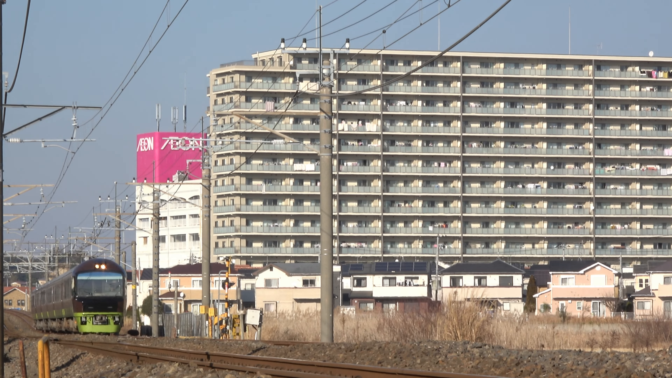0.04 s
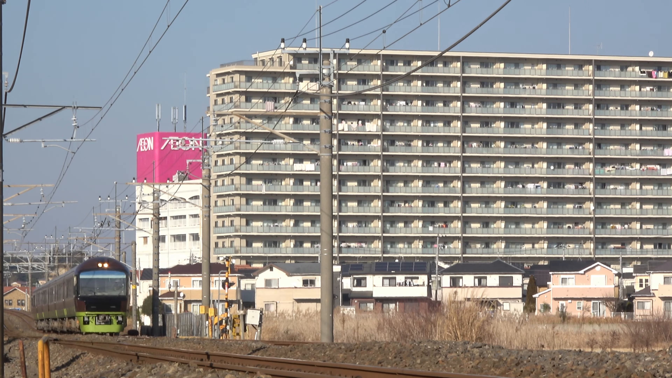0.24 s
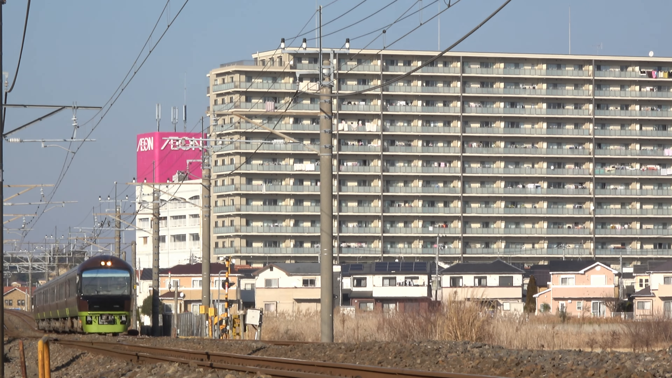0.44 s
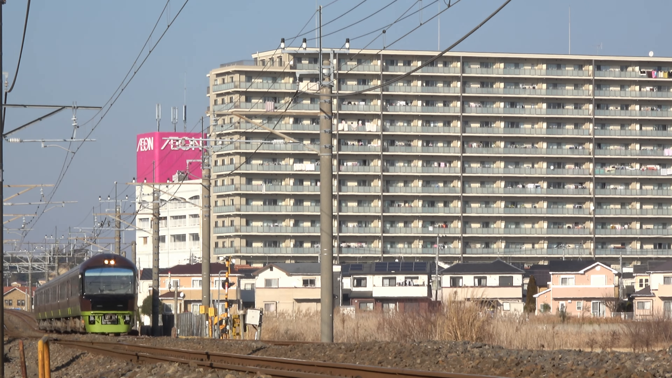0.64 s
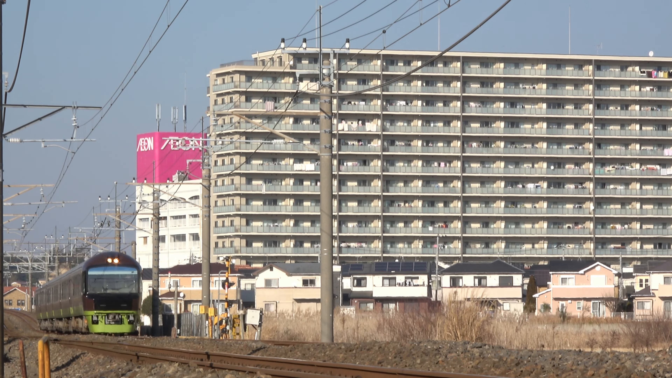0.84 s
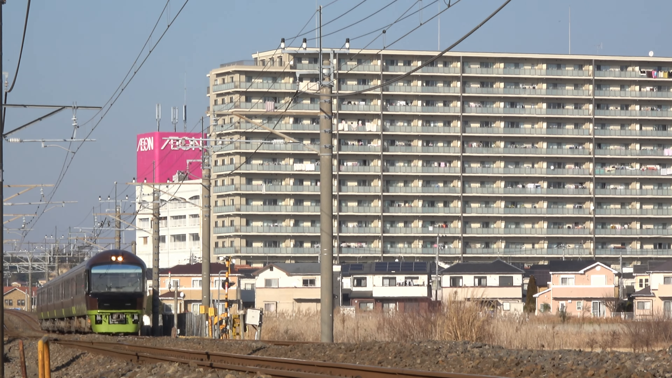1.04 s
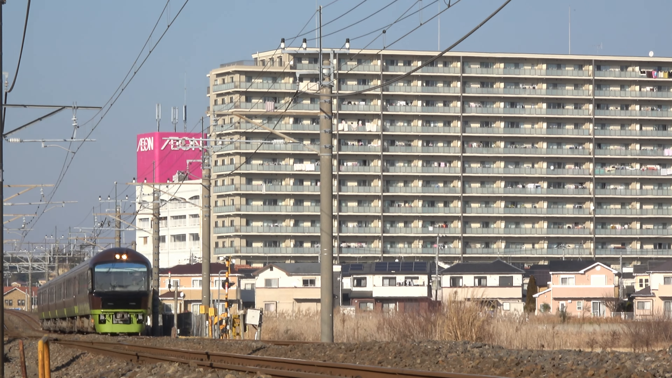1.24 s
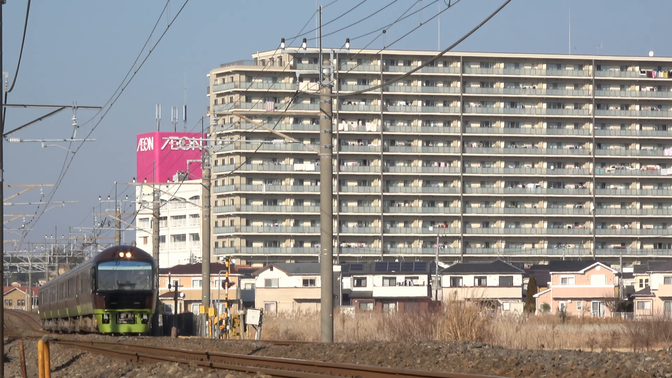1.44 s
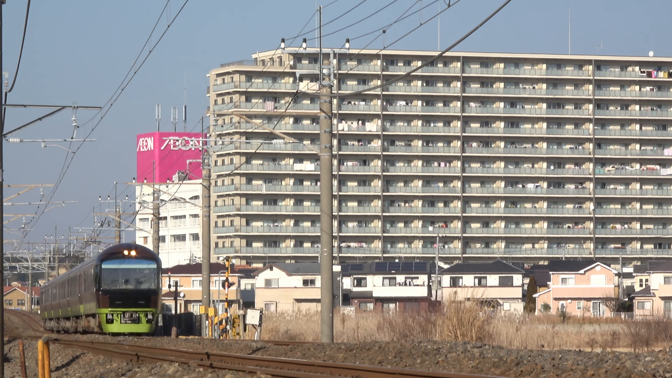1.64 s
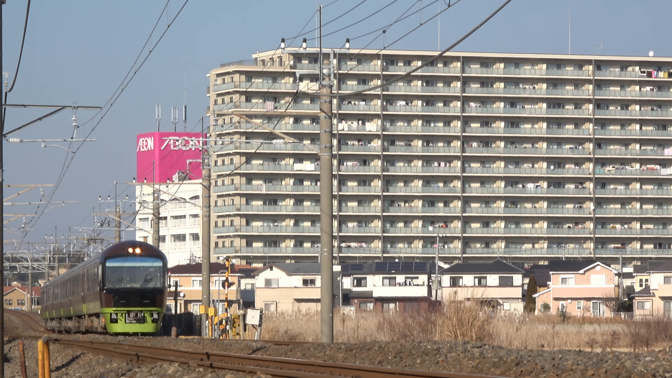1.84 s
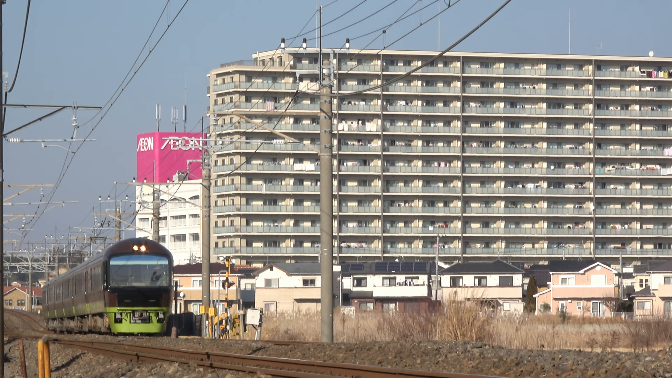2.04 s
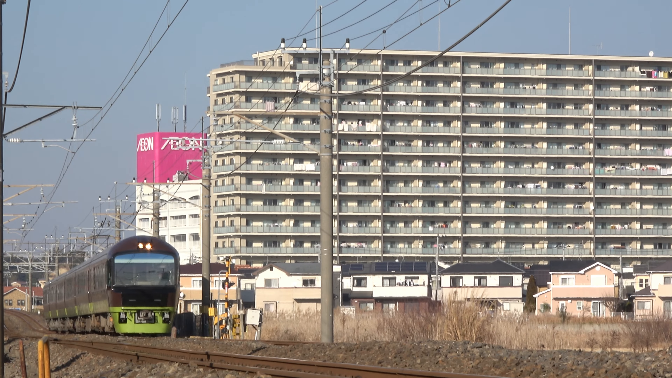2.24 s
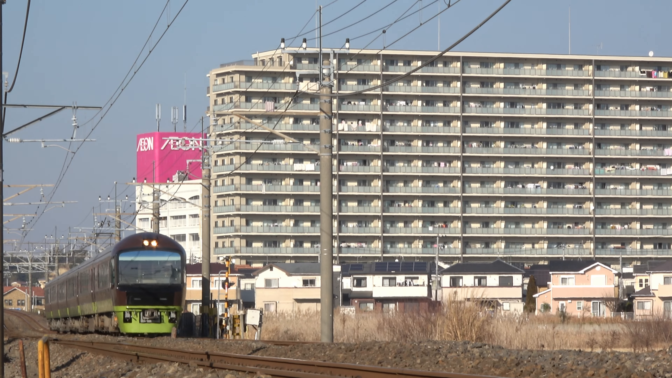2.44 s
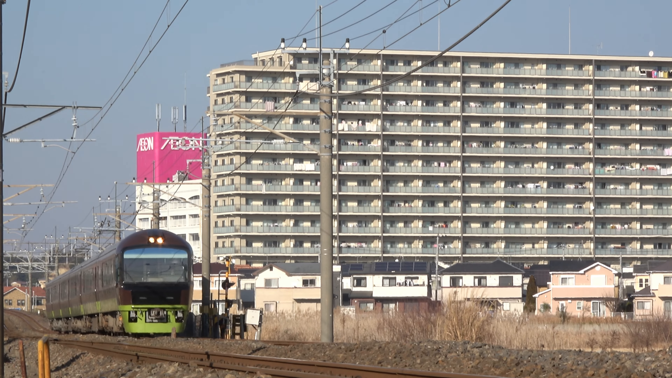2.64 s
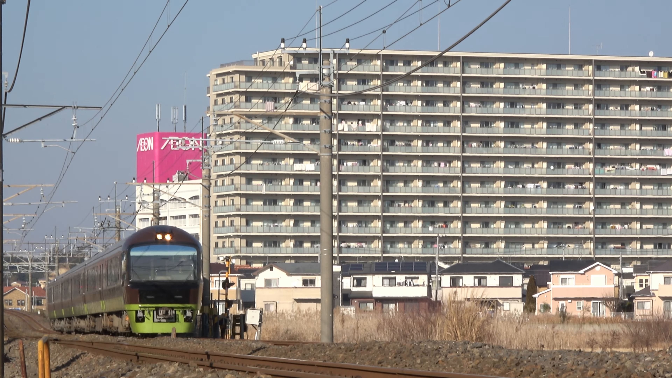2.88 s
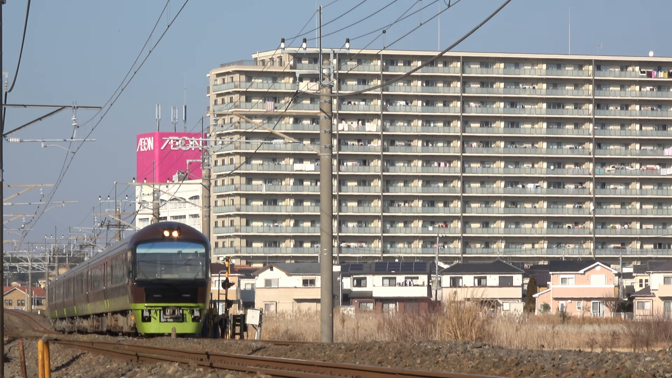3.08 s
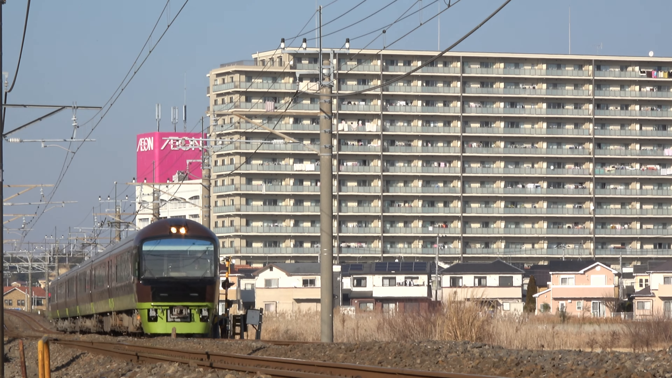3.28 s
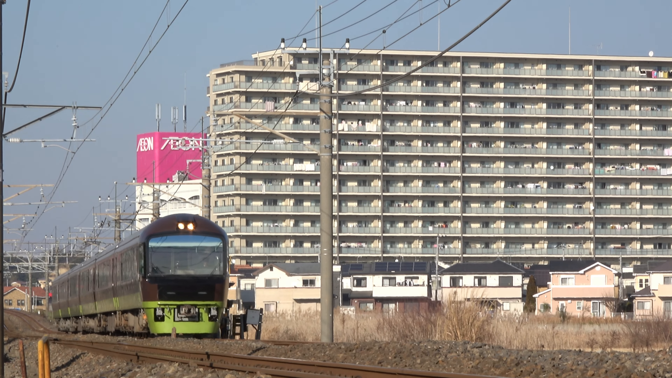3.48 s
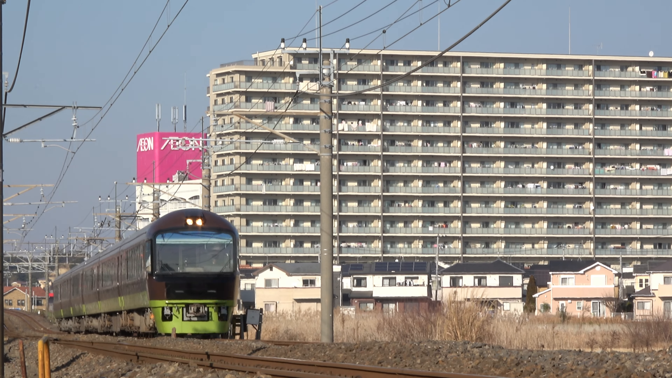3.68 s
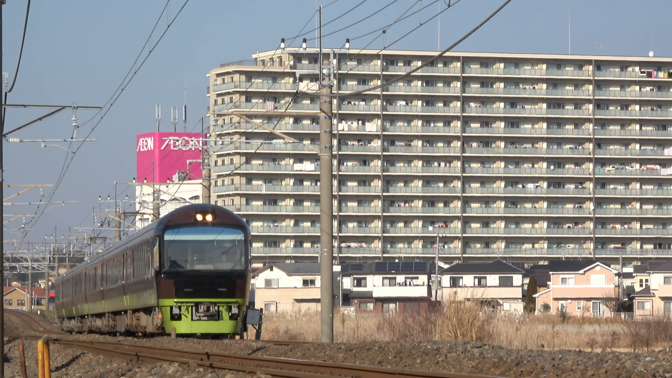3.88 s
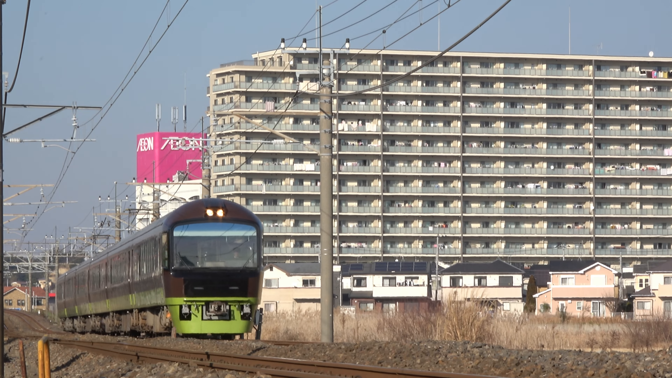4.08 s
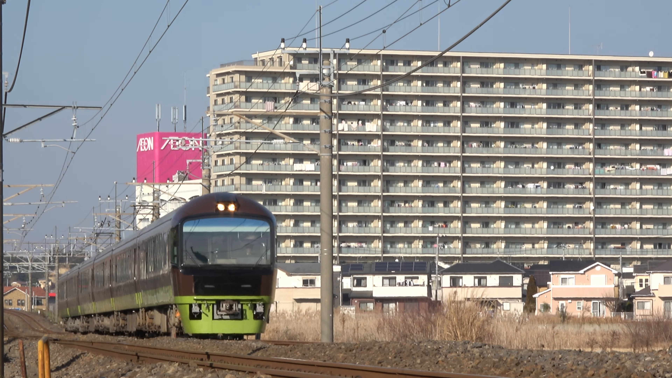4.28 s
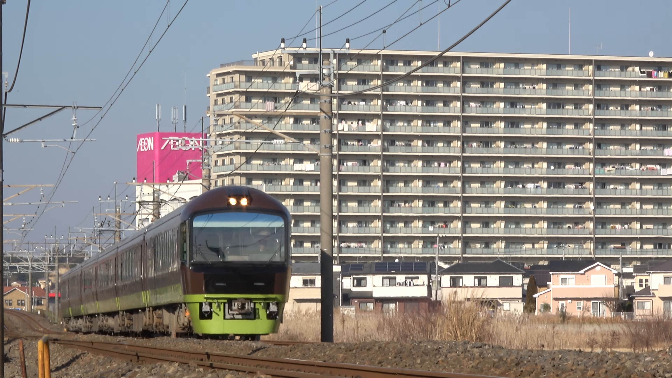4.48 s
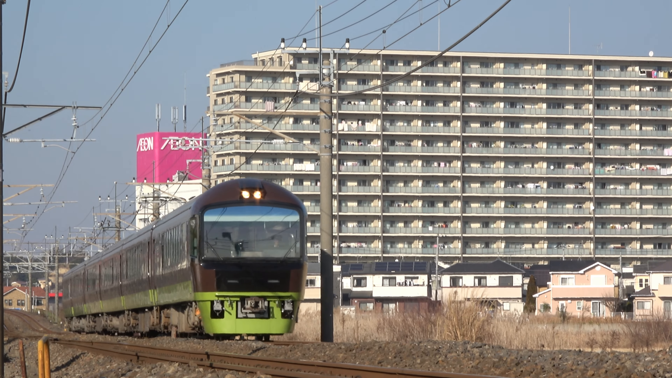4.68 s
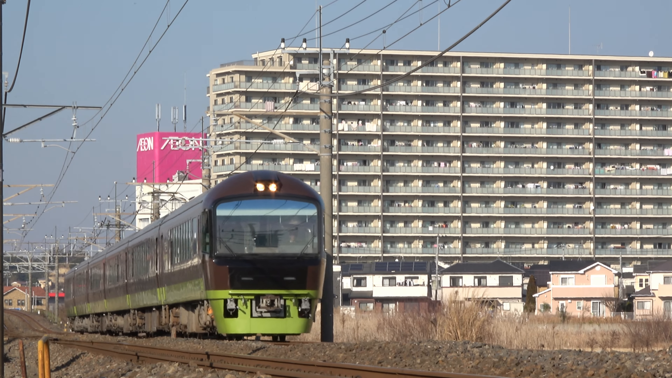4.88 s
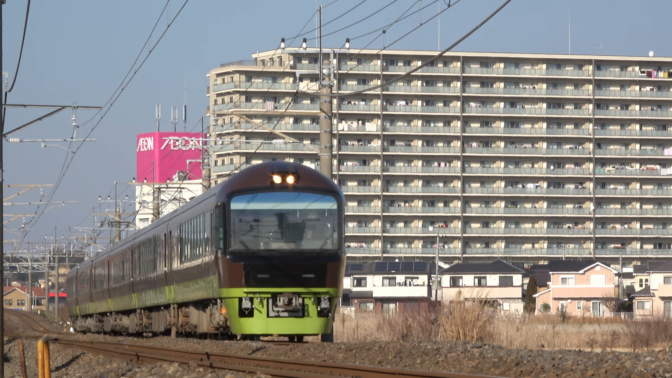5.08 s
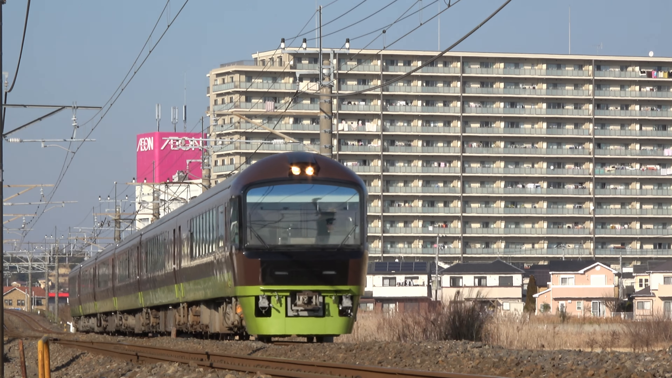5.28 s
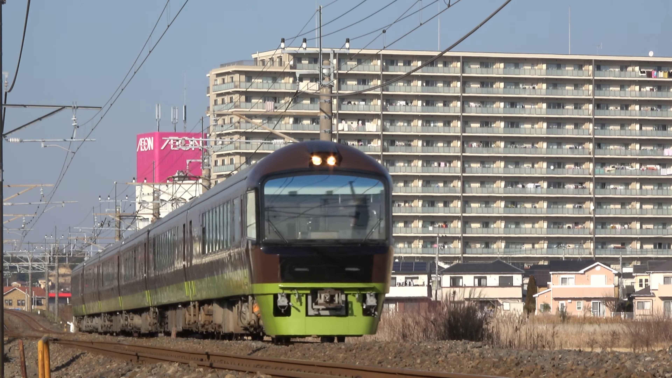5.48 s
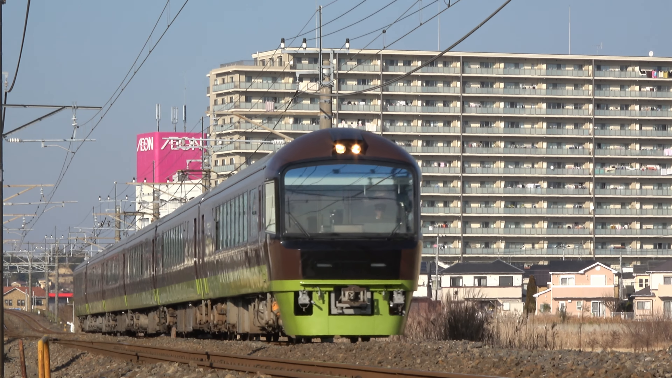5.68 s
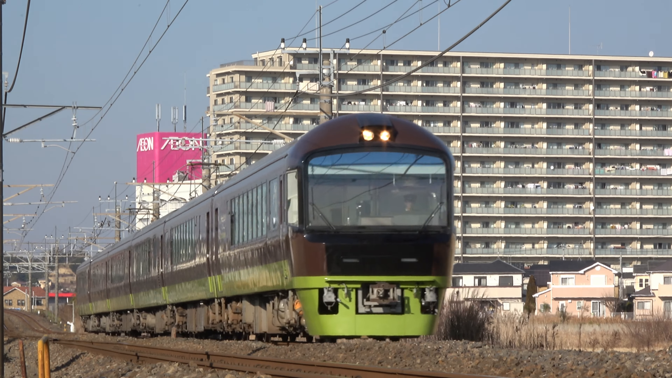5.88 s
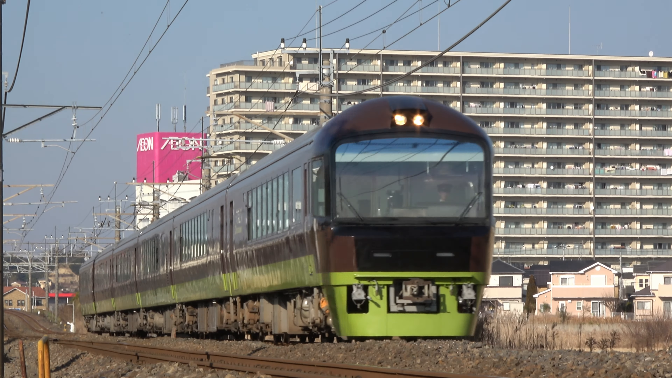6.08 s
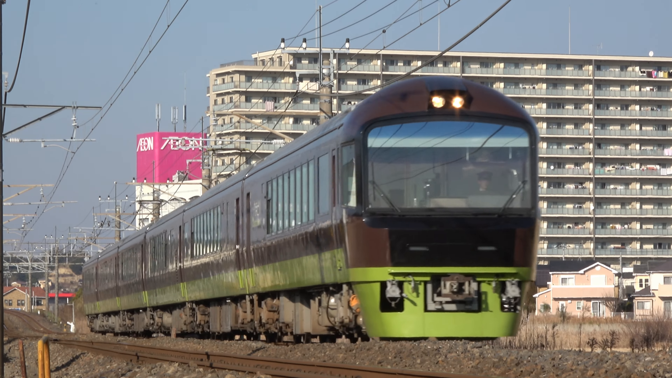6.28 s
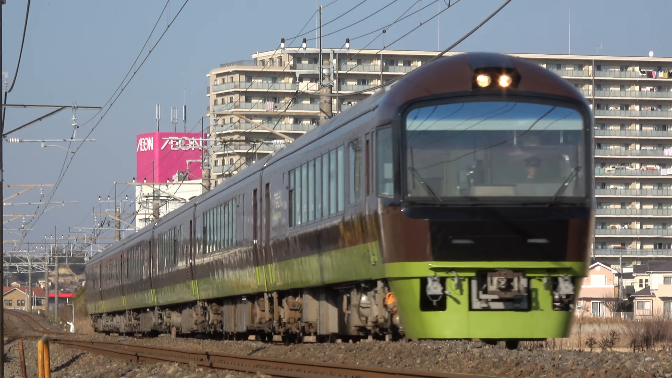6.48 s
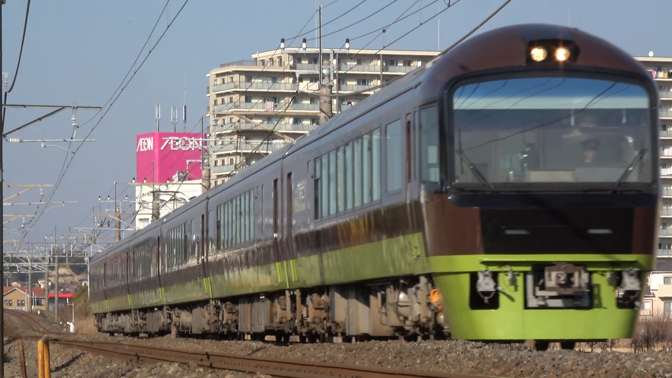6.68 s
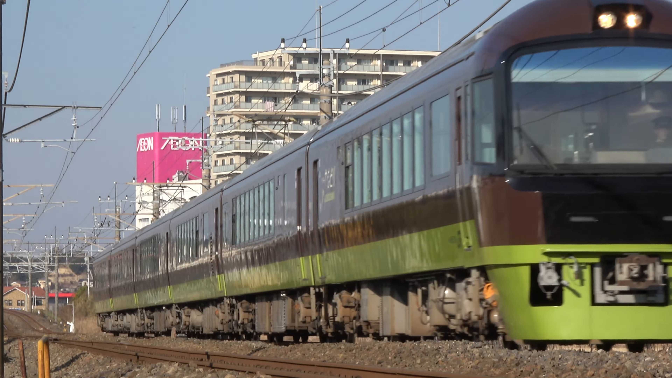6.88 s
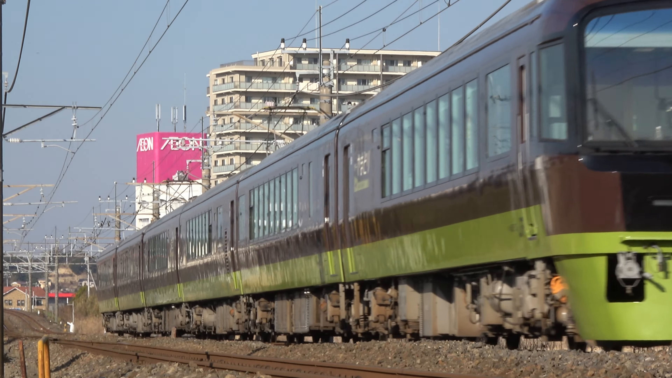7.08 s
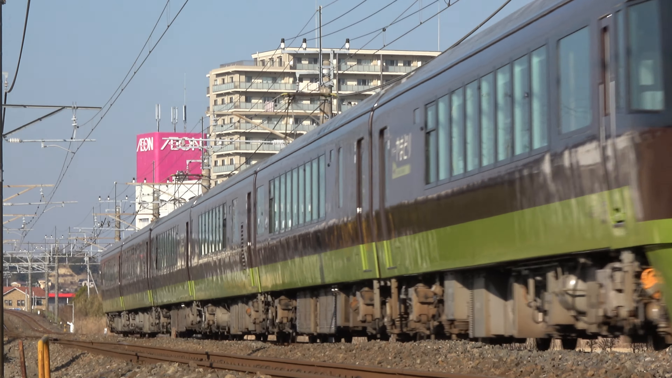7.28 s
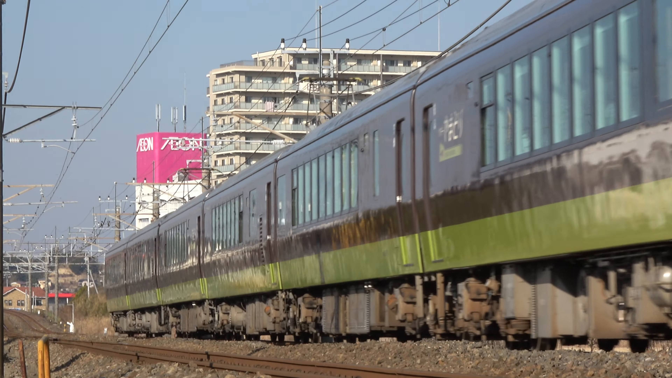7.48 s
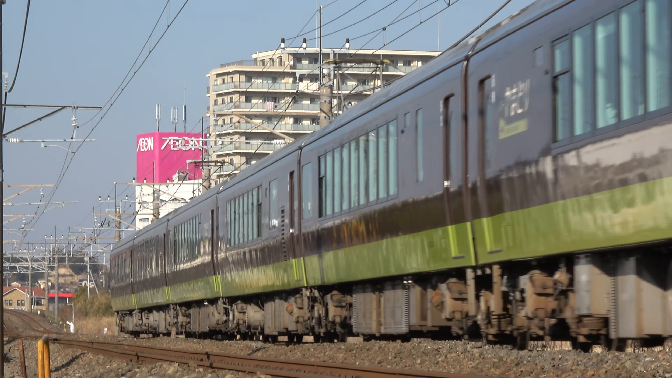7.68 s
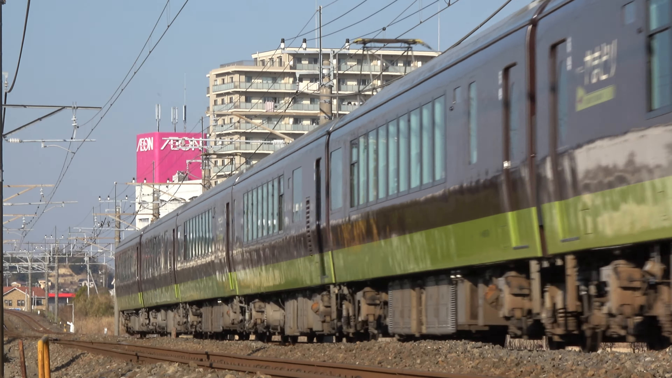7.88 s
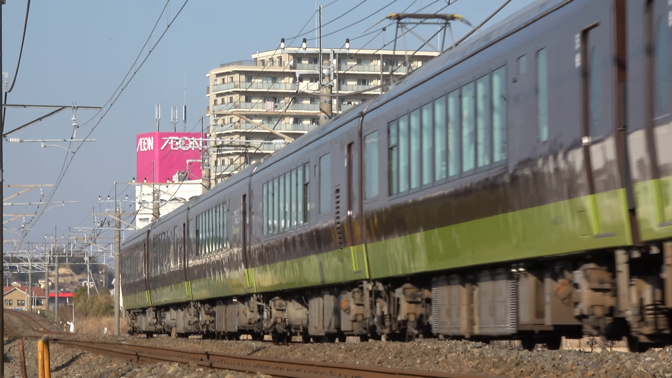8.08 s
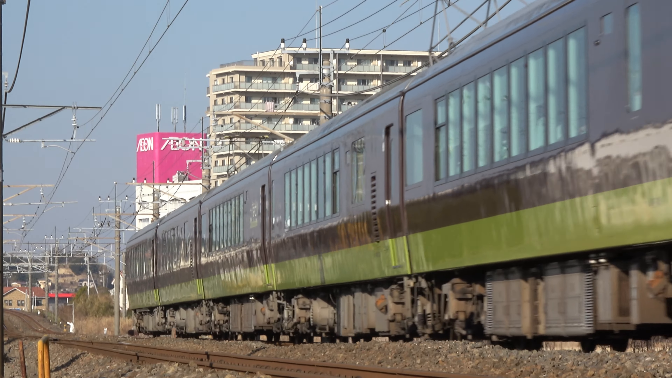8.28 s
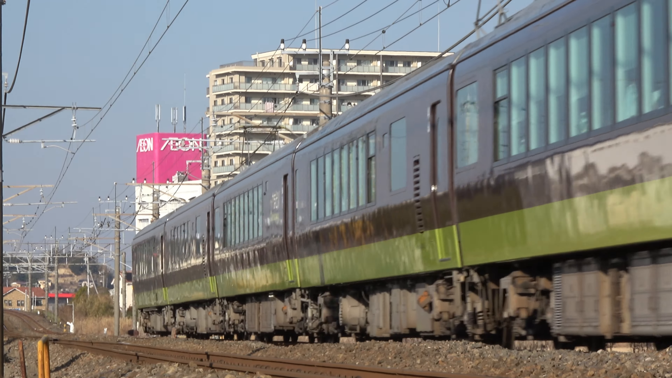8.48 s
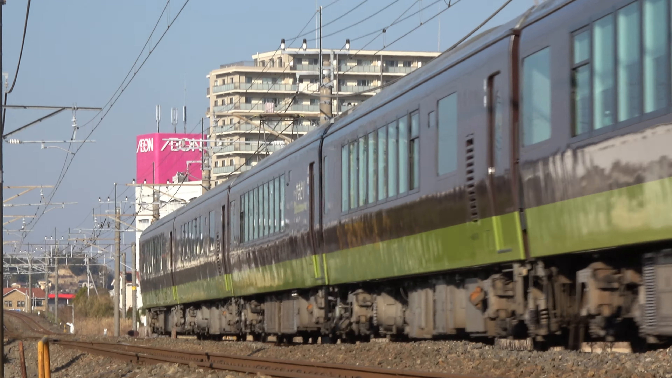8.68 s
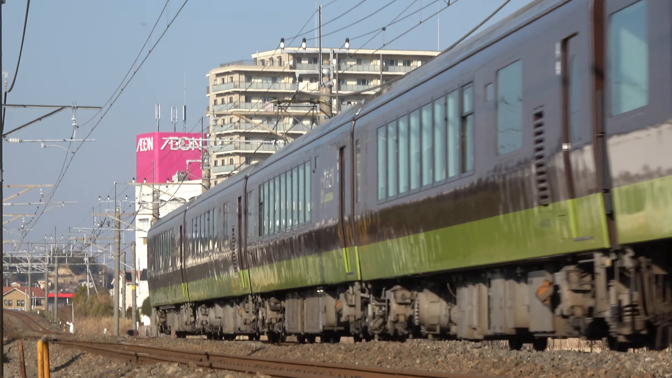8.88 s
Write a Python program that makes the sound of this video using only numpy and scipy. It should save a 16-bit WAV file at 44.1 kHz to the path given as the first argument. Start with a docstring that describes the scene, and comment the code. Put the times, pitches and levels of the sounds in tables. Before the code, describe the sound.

A stereo microphone close to the track hears a distant train as faint hum, rumble and rapid falling rail chirps from the left. Rails sing and hiss ahead of it while a camera's mirror and shutter clack close by. Rolling noise grows into a bright steel roar with heavy knocks and drumming, loudest at the end as cars pass on the right.

```python
"""Beside a bend in a railway, an electric train nears and sweeps past close on the right.
A flat spot on one wheel strikes the rail once a turn, and each blow runs ahead as a falling chirp.
Then steel rolling on steel makes bogies boom and wheels roar, hiss and ring; knocks and drumming join in,
and a thin whine drops in pitch. The rails sing and hiss ahead of the train, over a faint hum and air noise.
A camera's mirror and shutter clack nearby: one frame, a pair, then a fast run; a few small ticks fall too."""
import sys
import numpy as np
from scipy import signal
from scipy.fft import rfft, irfft, next_fast_len
from scipy.io import wavfile
from scipy.ndimage import uniform_filter1d

SR = 44100
rng = np.random.default_rng(int(sys.argv[2]) if len(sys.argv) > 2 else 0)


def transcribe(signal):
    """Save signal, clipped to [-1, 1], as a 16-bit WAV file at the path in sys.argv[1]."""
    frames = np.atleast_2d(signal).T
    limited = np.clip(frames, -1, 1)
    pcm = np.round(limited * 32767).astype(np.int16)
    wavfile.write(sys.argv[1], SR, pcm)


N = 393813
TIME = np.arange(N) / SR


def undb(db):
    """Turn decibels into a gain."""
    return 10 ** (np.asarray(db) / 20)


def curves(table):
    """Join each column of a table by straight lines in time."""
    s, *columns = np.transpose(table)
    return [np.interp(TIME, s, column) for column in columns]


def swells(table, width_s):
    """Add up smooth rises and dips in level, in dB, one for each (t/s, level change/dB)."""
    return sum(db * np.exp(-((TIME - s) / width_s) ** 2) for s, db in table)


def plateau(s, length, fade_s):
    """Make an envelope that fades in, holds and fades out."""
    return np.interp(TIME, [s, s + fade_s, s + length - fade_s, s + length], [0, 1, 1, 0])


def strike(t, rise, decay):
    """Shape a blow: a quick straight rise, then exponential decay."""
    return np.clip(t / rise, 0, 1) * np.exp(-np.maximum(t - rise, 0) / decay)


def unit(x):
    """Scale to rms 1."""
    return x / np.sqrt(np.mean(x ** 2))


def noise(colour, size=N):
    """Make noise of rms 1 whose spectrum follows (f/Hz, level/dB) and falls steeply beyond the ends."""
    n = next_fast_len(size, True)
    octave = np.log2(np.arange(n // 2 + 1) * SR / n + 1)
    hz, db = np.transpose(colour)
    outside = np.abs(octave - np.clip(octave, np.log2(hz[0]), np.log2(hz[-1])))
    gain = undb(np.interp(octave, np.log2(hz), db) - 60 * outside)
    white = rng.standard_normal(n)
    return unit(irfft(gain * rfft(white), n)[:size])


def walk(rate):
    """Drift smoothly at random around 0, with a spread near 1; rate is in steps per second."""
    k = max(int(SR / rate), 1)
    steps = np.repeat(rng.standard_normal(N // k + 1), k)
    return unit(uniform_filter1d(uniform_filter1d(steps, k), k)[:N])


def tone(hz, waver, rate):
    """Make a sine of rms 1 whose pitch wavers."""
    wavering_hz = hz * (1 + waver * walk(rate))
    return np.sqrt(2) * np.sin(2 * np.pi * np.cumsum(wavering_hz) / SR)


def pan(db):
    """Give left and right gains that average 1; db is left minus right."""
    left = np.atleast_1d(undb(db))
    return 2 * np.array([left, np.ones_like(left)]) / (1 + left)


def spread(colour, pan_db, width):
    """Make a wide source: noise from one bearing, plus scatter that differs between the ears."""
    opposite = np.array([[1], [-1]])
    return pan(pan_db) * (noise(colour) + width * opposite * noise(colour))


def add(out, s, sound):
    """Mix a sound in at a time in seconds."""
    i = max(int(s * SR), 0)
    out[..., i:i + sound.shape[-1]] += sound[..., :max(N - i, 0)]


# the train: its speed, when its leading wheels draw level, and how far off the track lies
SPEED_M_S, ARRIVES_S, TRACK_M = 24, 8.6, 7


def ahead(reach_m=0):
    """Metres that the front of the train has still to come; zero while the cars go by."""
    return np.maximum(SPEED_M_S * (ARRIVES_S - TIME) - reach_m, 0)


def doublings():
    """How many times the distance is double that of the train alongside."""
    return np.log2(np.hypot(ahead(), TRACK_M) / TRACK_M)


# the close-up colours take over around this distance, this abruptly
CLOSE_UP_M, CLOSE_UP_STEEPNESS = 48, 4


def nearness():
    """Go from 0 far off to 1 alongside."""
    return 1 / (1 + (ahead() / CLOSE_UP_M) ** CLOSE_UP_STEEPNESS)


def carried(close_db, doubling_db, track_db, db_per_m, reach_m, stretch_db=0):
    """Level in dB: sound that spreads through the air, plus sound that the track carries ahead."""
    metres = ahead(reach_m)
    by_air = undb(close_db - doubling_db * np.log2(np.hypot(metres, TRACK_M) / TRACK_M))
    by_track = undb(track_db - db_per_m * metres + stretch_db)
    return 20 * np.log10(np.hypot(by_air, by_track))


# where parts are heard, left minus right: (t/s, roar level/dB, rail level/dB, wheels level/dB)
SIDES = [(0, 10, 2, 14), (2.4, 6.2, -6, 4), (5.2, 0, -20.5, -1.5), (7.4, -5, -19, -3.5),
         (7.9, -5, -9.5, -4), (8.35, -7, -6.5, -7), (8.75, -20.5, -20, -15), (8.93, -27, -29, -18)]


def sides():
    """Follow the bearings of roar, rail and wheels; some sources use only a share of one."""
    return curves(SIDES)


# some stretches of track pass the sound on better than others: (t/s, level/dB)
TRACK_STRETCHES = [(0, -2), (1.2, -6), (1.33, -1), (1.45, -7), (1.56, 10), (1.7, -1), (2.05, 2), (2.28, -4),
                   (2.4, 1), (2.63, -3), (2.75, 5), (2.98, 3.5), (3.1, -5), (3.32, -5), (3.44, 6),
                   (3.67, 6), (3.9, -4), (4.13, 4), (4.24, 3), (4.36, -4), (4.57, -5), (4.69, 6), (4.92, 6),
                   (5.03, -2), (5.25, 0), (5.37, 5), (5.48, -9), (5.59, 4), (5.7, 5), (5.82, -1), (5.93, 5),
                   (6.03, 3.5), (6.14, -2), (6.25, -1), (6.37, 4), (6.47, -9), (6.6, 0), (6.8, -5),
                   (6.92, -3), (7.02, 2), (7.13, -3), (7.34, -6)]


def stretches():
    """Follow how well the track passes sound on, in dB."""
    return curves(TRACK_STRETCHES)[0]


# colour of the faint air noise: (f/Hz, relative level/dB per Hz)
AIR_COLOUR = [(1500, 9), (4500, -13), (6000, -1), (9000, -3.5), (13000, -3.5), (16000, -6)]


def air():
    """A faint steady hiss, spread wide, from shaped noise."""
    return undb(-70.5) * spread(AIR_COLOUR, 0, width=1.0)


HUM_HZ, HUM_DB = 317.5, -57.5
HUM_START_S, HUM_ATTACK_S, HUM_HOLD_S, HUM_RELEASE_S = .62, .14, .7, .8


def distant_hum():
    """A distant hum, one slightly wavering sine, swells once."""
    corners_s = np.cumsum([HUM_START_S, HUM_ATTACK_S, HUM_HOLD_S, HUM_RELEASE_S])
    swell = np.interp(TIME, corners_s, [0, 1, 1, 0])
    return tone(HUM_HZ, waver=.002, rate=11.9) * undb(HUM_DB) * swell * pan(db=15)


# small sharp ticks: (t/s, level/dB, centre f/Hz)
SMALL_TICKS = [(3.004, -39, 3300), (3.581, -57, 9000), (4.357, -39, 3200), (4.672, -57, 8000),
               (5.626, -52, 9200), (5.758, -42, 3600)]


def ticks():
    """Tiny dry clicks are very short bursts of noise."""
    out, t = np.zeros(N), np.arange(SR // 30) / SR
    for s, db, hz in SMALL_TICKS:
        click = noise([(hz / 2, -14), (hz, 0), (hz * 1.9, -18)], size=len(t))
        add(out, s, undb(db) * click * strike(t, rise=0.00046, decay=0.0025))
    return out * pan(db=-2)


# the rails sing faintly ahead of the train: (t/s, length/s, f/Hz, level/dB)
RAIL_SONG = [(2.43, .55, 5105, -80.5), (3.17, .15, 5105, -83), (4.05, 0.14, 5290, -76),
             (4.66, 1.1, 5930, -81), (4.66, 1.1, 5580, -81), (4.66, 1.1, 6250, -80),
             (5.01, 0.2, 5115, -68.5), (5.2, 0.6, 5100, -77), (5.72, 1.7, 6280, -73)]
SING_FADE_S, SING_WIDTH_HZ, SING_FLICKER_DB = .05, 95, .5


def rail_song():
    """The rails sing in faint, ragged swells: each tone is a narrow band of noise."""
    song = 0
    for s, length, hz, db in RAIL_SONG:
        ragged = walk(SING_WIDTH_HZ) + 1j * walk(SING_WIDTH_HZ)
        drive = ragged * undb(db + SING_FLICKER_DB * walk(14))
        song = song + plateau(s, length, SING_FADE_S) * np.real(drive * np.exp(2j * np.pi * hz * TIME))
    return song * pan(db=-7)


# colour of the rails' hiss: (f/Hz, relative level/dB per Hz)
RAIL_HISS_COLOUR = [(1700, -8), (2200, 0), (2700, 0), (3400, -5), (4200, -15), (5200, -18)]
# how that hiss rises and falls: (t/s, level/dB)
RAIL_HISS_LEVEL = [(3.3, -78), (3.75, -61), (4.2, -65), (4.8, -67), (5.3, -60), (5.7, -59), (6.3, -62),
                   (7, -57), (7.5, -48), (7.9, -45), (8.3, -42), (8.6, -50)]


def rail_hiss():
    """Fine roughness of the track makes the rails hiss in uneven swells."""
    db = curves(RAIL_HISS_LEVEL)[0] + 1.5 * walk(9) + 2 * walk(70)
    return undb(db) * spread(RAIL_HISS_COLOUR, sides()[2], width=.3)


# the camera fires, singly or in runs: (first frame t/s, number of frames, level/dB added to every stroke)
CAMERA_RELEASES = [(3.072, 1, -4.1), (4.422, 2, -4.9), (5.848, 1, -3.8), (5.996, 10, -4.4)]
FRAME_S = .1427  # from one frame of a run to the next
# strokes of the three moving parts: (t/s around the frame's own time, level/dB, decay/s)
MIRROR_UP_STROKES = [(-.0505, -34.5, 0.008), (-.0412, -33, 0.0085), (-.0315, -36.5, 0.0084),
                     (-.0172, -44.5, .007)]
CURTAIN_STROKES = [(-.0042, -37.5, 0.0032), (.0004, -24, 0.0044), (.0112, -38.5, 0.0069)]
MIRROR_DOWN_STROKES = [(0.0182, -32.3, 0.004), (0.022, -29, 0.0013), (.0256, -32, 0.0085),
                       (.0402, -56.5, 0.0074)]
# what the strokes of each part ring with: (f/Hz, relative level/dB per Hz)
MIRROR_UP_COLOUR = [(300, -13), (900, -8), (1600, -1.5), (2400, 0), (3200, 0), (4200, -6.5), (5700, -9),
                    (7200, -12.5), (9000, -10.5), (11000, -16), (15500, -25)]
CURTAIN_COLOUR = [(300, -8), (850, 1), (1300, -1), (1880, 3), (2300, -1.5), (3200, -1.5), (5400, -12.5),
                  (7400, -4), (9500, -8), (11400, -8), (14000, -12), (15800, -20)]
MIRROR_DOWN_COLOUR = [(300, -5), (900, -3), (1600, 6.5), (3200, 6.5), (4500, 3.5), (5700, -0.5), (7300, -1),
                      (9000, 3.5), (10800, -1.5), (14000, -3), (15800, -6)]
# the camera body rings on after the mirror starts up: (f/Hz, level/dB, decay/s)
CAMERA_BODY_TONES = [(2050, -51, .009), (3110, -45, .009), (4400, -53, .007)]
CAMERA_DETUNE = .06  # random spread of those pitches, as a share


def shutter():
    """The mirror flips up and bounces, the curtain snaps, the mirror drops and rattles; the body rings."""
    out, lead = np.zeros((2, N)), .06  # seconds kept free for strokes before the frame's own time
    t = np.arange(SR // 6) / SR - lead
    opposite = np.array([[1], [-1]])
    frames = [(s + k * FRAME_S, db) for s, shots, db in CAMERA_RELEASES for k in range(round(shots))]
    parts = [(MIRROR_UP_COLOUR, MIRROR_UP_STROKES), (CURTAIN_COLOUR, CURTAIN_STROKES),
             (MIRROR_DOWN_COLOUR, MIRROR_DOWN_STROKES)]
    for colour, strokes in parts:
        power = sum((undb(db) * strike(t - s, rise=0.001, decay=decay)) ** 2 for s, db, decay in strokes)
        blows = np.sqrt(power)
        body = noise(colour, size=len(t))  # the same parts ring alike in every frame
        for s, db in frames:
            centre, side = [noise(colour, size=len(t)) for _ in range(2)]
            # levers chatter within each stroke, which breaks it into tiny clicks
            chatter = undb(2.1 * noise([(250, 0), (1000, 0)], size=len(t)) - .2)
            clatter = 0.45 * body + 0.85 * centre + .4 * opposite * side
            add(out, s - lead, undb(db) * blows * chatter * clatter)
    for s, db in frames:
        for hz, mode_db, decay in CAMERA_BODY_TONES:
            swell = strike(t - MIRROR_UP_STROKES[0][0], rise=.01, decay=decay)
            detuned_hz = hz * (1 + CAMERA_DETUNE * rng.standard_normal())
            ring = np.sqrt(2) * np.sin(2 * np.pi * detuned_hz * t)
            add(out, s - lead, undb(db + mode_db) * swell * ring)
    return out * pan(db=-5)


# pitch at the source, when it passes and how far to the side
WHINE_HZ, WHINE_PASSES_S, WHINE_SIDE_M = 6770, 8.7, 4.2
# it is beamed forward, so it peaks early and fades fast
WHINE_PEAK_S, WHINE_DB, WHINE_RISE_DB_PER_S, WHINE_FADE_DB_PER_S = 8.3, -36.3, 31, 48
# the whine breaks into patches: (t/s, level change/dB)
WHINE_SWELLS = [(7.7, 4), (7.98, -5), (8.1, 3), (8.21, -7), (8.29, 2), (8.36, -6), (8.42, 3)]
WHINE_PATCH_S = .03


def whine():
    """An unsteady whine under the leading car grows as it nears; motion lowers its pitch as it passes."""
    along = SPEED_M_S * (WHINE_PASSES_S - TIME)
    # closing speed as a share of the speed of sound
    closing_mach = SPEED_M_S / 343 * along / np.hypot(along, WHINE_SIDE_M)
    late = TIME - WHINE_PEAK_S
    db = WHINE_DB - np.maximum(-WHINE_RISE_DB_PER_S * late, WHINE_FADE_DB_PER_S * late)
    db = db + swells(WHINE_SWELLS, WHINE_PATCH_S)
    flutter = undb(3 * walk(110) - 1.5)
    return tone(WHINE_HZ * (1 + closing_mach), waver=.007, rate=380) * undb(db) * flutter * pan(db=-4)


# the car bodies drum on one note at a time: (t/s, length/s, f/Hz, level/dB)
DRUM_NOTES = [(8.01, .08, 200, -27), (8.255, .08, 185, -22), (8.485, .135, 188, -18.5),
              (8.595, .095, 228, -20.5), (8.7, .09, 231, -19), (8.78, .14, 229, -24)]
DRUM_FADE_S = .025


def drumming():
    """Floor panels of the cars boom briefly, each time on one wavering note."""
    out = 0
    for s, length, hz, db in DRUM_NOTES:
        out = out + undb(db) * plateau(s, length, DRUM_FADE_S) * tone(hz, waver=.015, rate=60)
    return out * pan(.25 * sides()[0])


# heavy knocks of wheel flats and welds: (t/s, level/dB before the ring and rattle shares, f/Hz, decay/s)
HEAVY_KNOCKS = [(2.06, -41, 120, .051), (5.235, -36.5, 130, .07), (5.603, -37, 1260, .015),
                (5.71, -37, 1100, .02), (6.375, -39, 1120, .015), (6.585, -34, 540, .025),
                (6.664, -33, 187, .045), (6.696, -32, 940, .012), (7.136, -27.5, 540, .018),
                (7.243, -30, 540, .014), (7.354, -28.5, 550, .016), (7.638, -19, 165, .022),
                (7.64, -26, 270, .024), (7.643, -25.5, 400, .028), (7.735, -21, 165, .017),
                (7.757, -25.5, 400, .024), (7.801, -25, 880, .017), (7.908, -22, 890, .017),
                (8.012, -18, 900, .016), (8.117, -23, 920, .02), (8.228, -23, 1000, .018),
                (8.335, -20, 980, .03), (8.425, -19, 880, .025), (8.133, -17, 195, .02),
                (8.238, -20.5, 460, .025), (8.424, -20, 570, .014), (8.443, -16, 410, .02),
                (8.615, -16, 350, .016), (8.645, -17, 385, .018), (8.675, -20, 455, .02),
                (8.712, -18, 355, .02)]
# each knock sinks in pitch as the slower bending waves arrive
KNOCK_SAG_OCT_PER_S, KNOCK_RISE_S = 4.5, .009
KNOCK_RING, KNOCK_RATTLE = .75, .55  # shares of clear ring and of noise


def knocks():
    """Each knock rings one resonance of bogie or track, sinking in pitch, with a rattle around it."""
    out, t = np.zeros(N), np.arange(SR // 5) / SR
    for s, db, hz, decay in HEAVY_KNOCKS:
        pitch = hz * 2 ** (-KNOCK_SAG_OCT_PER_S * (t - 2 * KNOCK_RISE_S))
        ring = np.sqrt(2) * np.sin(2 * np.pi * (np.cumsum(pitch) / SR + rng.random()))
        rattle = noise([(hz / 1.44, -13), (hz, 0), (hz * 1.33, -13)], size=len(t))
        knock = KNOCK_RING * ring + KNOCK_RATTLE * rattle
        add(out, s, undb(db) * knock * strike(t, rise=KNOCK_RISE_S, decay=decay))
    return out * pan(0.81 * sides()[0])


# the flat strikes once a turn, and each turn is a little shorter as the train gathers speed
FIRST_BLOW_S, TURN_S, TURN_SHORTENS_S = .1295, .121214, .0002148
# level with the wheel alongside, loss along the rail, and random spread from blow to blow
FLAT_DB, FLAT_LOSS_DB_PER_M, FLAT_SCATTER_DB = -24.3, .143, 1


def flat_blows(count=63):
    """List the time and level of the blow on each turn of the wheel."""
    turn = np.arange(count)
    s = FIRST_BLOW_S + TURN_S * turn - TURN_SHORTENS_S * turn ** 2 / 2
    db = np.interp(s, TIME, FLAT_DB - FLAT_LOSS_DB_PER_M * ahead() + stretches())
    return list(zip(s, db + FLAT_SCATTER_DB * rng.standard_normal(count)))


# blows from other wheels fall between those of the flat: (t/s, level/dB of a fully formed chirp)
OTHER_WHEEL_BLOWS = [(2.562, -43.5), (2.885, -45), (3.357, -42.5), (4.1, -43), (5.506, -32.5)]
# colours of the rail, far and close: (f/Hz, relative level/dB per Hz); rail() plays both
RAIL_FAR_COLOUR = [(950, -53), (1110, -3), (1165, -6), (1240, 0), (1290, -3), (1360, 5.5), (1450, 0),
                   (1530, 3.5), (1630, -8), (1850, -51)]
RAIL_NEAR_COLOUR = [(950, -20), (1120, 6), (1170, 2), (1225, 5.5), (1290, 1), (1390, 2), (1550, -9.5),
                    (1680, -6), (1900, -18)]
CHIRP_FORMS_M = 24  # the rail needs this length to draw a blow out into a full chirp


def wheel_flat(start_hz=1620, end_hz=1120, glide_s=0.0085, echo_s=0.006):
    """Each blow runs ahead along the rail; high bending waves come first, so it chirps downwards."""
    out, t = np.zeros(N), np.arange(SR // 8) / SR
    near, distance_m = nearness(), ahead()
    blows = flat_blows() + OTHER_WHEEL_BLOWS
    for (s, db), chance in zip(blows, rng.standard_normal((len(blows), 4))):
        i = int(s * SR)
        glide = np.exp(-t / (glide_s * np.exp(.25 * chance[2])))
        hz = (end_hz + (start_hz - end_hz) * glide) * (1 + 0.019 * chance[0])
        envelope = strike(t, rise=0.0045, decay=0.0036 * np.exp(.3 * chance[3]))
        chirp = np.sqrt(2) * np.sin(2 * np.pi * np.cumsum(hz) / SR) * envelope
        echo = 0.48 * np.interp(t - echo_s * (1 + 0.148 * chance[1]), t, chirp, left=0)
        ring = 0.28 * noise(RAIL_FAR_COLOUR, size=len(t)) * strike(t, rise=0.0077, decay=0.031)
        # slow low waves die out sooner along the rail, so they trail only the nearer blows
        slow_hz = 1350 / np.sqrt(1 + t / .022) * (1 + .07 * chance[1])
        # every sleeper scatters a little of the wave
        blur = noise([(20, -4), (120, -1), (250, -10)], size=len(t))
        slow = blur * np.sin(2 * np.pi * np.cumsum(slow_hz) / SR) * strike(t, rise=0.011, decay=0.034)
        slow = 0.66 * np.sqrt(near[i]) * slow
        formed = min(distance_m[i] / CHIRP_FORMS_M, 1)
        add(out, s, formed * undb(db) * (chirp + echo + ring + slow))
    return out * pan(db=-17.5)


# Every ..._CARRY below lists: level/dB alongside by air, loss/dB per doubling of distance,
# level/dB along the track, its loss/dB per m, reach/m ahead of the wheels.
STRETCH_SHARE = .3  # rolling comes from many wheels at once, so it feels only part of the stretches


def rolling_part(far, close, db, pan_db, width):
    """Blend a part's far colour into its close-up resonances as the train nears."""
    near = nearness()
    width = width * (1 - 0.53 * near)  # far off, more of the sound comes by way of echoes
    far_sound = np.sqrt(1 - near) * spread(far, pan_db, width)
    close_sound = np.sqrt(near) * spread(close, pan_db, width)
    return (far_sound + close_sound) * undb(db)


# colours of the ground, far and close: (f/Hz, relative level/dB per Hz)
GROUND_FAR_COLOUR = [(12, -34), (20, -5), (31, -9), (42, -3.5), (60, 6.5), (80, -1.5), (115, -5.5),
                     (140, -8), (200, -46)]
GROUND_NEAR_COLOUR = [(20, -26), (31, -9), (45, -1), (62, 3), (80, 0.5), (115, 0), (140, -4.5), (200, -50)]
GROUND_CARRY = (-31.6, 8.5, -37.6, .042, 6)


def ground():
    """Rough steel shakes the ground into a deep rumble."""
    side_db = -2.5 - 1.6 * nearness()
    return rolling_part(GROUND_FAR_COLOUR, GROUND_NEAR_COLOUR, carried(*GROUND_CARRY), side_db, width=.07)


# the boom swells twice, then sinks a little: (t/s, level change/dB)
BOOM_CHANGES = [(8.3, 4.5), (8.52, 5), (8.75, -2)]
BOOM_CHANGE_S = .075


def boom_changes():
    """Follow the rises and the dip of the boom in dB."""
    return swells(BOOM_CHANGES, BOOM_CHANGE_S)


# colours of the bogies, far and close: (f/Hz, relative level/dB per Hz)
BOGIE_FAR_COLOUR = [(105, -27), (128, -2.5), (185, -1), (250, -10), (300, -12.5), (350, -31)]
BOGIE_NEAR_COLOUR = [(105, -48), (128, -8), (148, -4.5), (165, -6), (189, 0.5), (210, -5.5), (231, 0),
                     (252, -7.5), (300, -14.5), (350, -49)]
BOGIE_CARRY = (-21.2, 8.2, -46.6, .026, 6.5)


def bogies():
    """Shaken bogies boom; the boom swells twice, then sinks a little."""
    db = carried(*BOGIE_CARRY) + boom_changes()
    return rolling_part(BOGIE_FAR_COLOUR, BOGIE_NEAR_COLOUR, db, .25 * sides()[0], width=0.18)


# colours of the roar, far and close: (f/Hz, relative level/dB per Hz)
ROAR_FAR_COLOUR = [(240, -15), (305, 3.5), (380, 1), (420, -2.5), (480, -3), (590, -2), (680, -4.5),
                   (790, 1), (880, -6), (1010, -3.5), (1110, 1), (1250, -24)]
ROAR_NEAR_COLOUR = [(250, -15), (305, -8.5), (375, 1.5), (480, 2.5), (540, 1.5), (610, -.5), (700, -3),
                    (830, -2), (980, .5), (1110, 0), (1300, -28)]
ROAR_CARRY = (-20.5, 7.8, -64.8, .02, 3)
ROAR_CHANGE_SHARE = .3  # the roar feels this part of the boom's rises and dip


def roar():
    """Rough steel rolling on steel makes the middle pitches roar."""
    db = carried(*ROAR_CARRY) + ROAR_CHANGE_SHARE * boom_changes()
    return rolling_part(ROAR_FAR_COLOUR, ROAR_NEAR_COLOUR, db, sides()[0], width=0.22)


RAIL_CARRY = (-28.6, 7.2, -40.8, .127, 2.4)


def rail():
    """The rail shakes under the wheels and carries the sound ahead."""
    db = carried(*RAIL_CARRY, STRETCH_SHARE * stretches())
    return rolling_part(RAIL_FAR_COLOUR, RAIL_NEAR_COLOUR, db, sides()[1], width=0.5)


# colours of the wheels, far and close: (f/Hz, relative level/dB per Hz)
WHEEL_FAR_COLOUR = [(1350, -10), (1680, 0), (1850, 0), (2150, -0.5), (2450, -4.5), (2650, -5), (3050, -7),
                    (3600, -11.5), (4200, -17.5), (4800, -21), (5600, -33)]
WHEEL_NEAR_COLOUR = [(1500, 3), (1720, -1), (2040, 4), (2380, -0.5), (2740, -2.5), (3100, -3), (3460, -4.5),
                     (3850, -4.5), (4280, -8.5), (4750, -7.5), (5400, -26)]
WHEEL_CARRY = (-22.4, 11.9, -48.8, .087, 6.5)


def wheels():
    """The wheels, shaken by rough steel, give a bright rush."""
    # close up, this rush is 3.2 dB below the level that WHEEL_CARRY gives
    db = carried(*WHEEL_CARRY, STRETCH_SHARE * stretches()) - 3.2 * nearness()
    return rolling_part(WHEEL_FAR_COLOUR, WHEEL_NEAR_COLOUR, db, sides()[2], width=0.11)


# colours of the highest rolling hiss, far and close: (f/Hz, relative level/dB per Hz)
HISS_FAR_COLOUR = [(2650, -36), (4500, -20), (4890, 1), (5260, -12), (5340, -0.5), (6110, -3), (6530, -8),
                   (7510, -6), (7750, -17), (9000, -0.5), (10300, -18), (12700, -2.5), (15500, -16)]
HISS_NEAR_COLOUR = [(4200, -25), (4850, 2), (5300, 1.5), (5700, 0.5), (6400, 3.5), (7600, -0.5),
                    (9000, -6.5), (12000, -11), (15500, -26)]
HISS_CARRY = (-31.8, 10.9, -61, .16, .5)


def rolling_hiss():
    """Steel scraping on steel hisses at the highest pitches."""
    db = carried(*HISS_CARRY, STRETCH_SHARE * stretches())
    return rolling_part(HISS_FAR_COLOUR, HISS_NEAR_COLOUR, db, 0.68 * sides()[2], width=0.45)


# ring tones of the wheel discs: (f/Hz before the pitch shifts, width/Hz, relative level/dB)
DISC_TONES = [(1970, 200, -13.5), (2080, 200, -12.5), (2640, 180, -19), (2765, 160, -12), (3260, 120, -22),
              (3550, 200, -13.5), (4380, 240, -16.5), (5380, 300, -18.5), (6240, 200, -27)]
# their pitch sinks as the bogies go by: (t/s, pitch factor)
PASSING_PITCH = [(7.6, 1.008), (8.25, 1.002), (8.55, .974), (8.93, .968)]
DISC_CARRY = (-23.6, 11.4, -58, .1, 6.7)
# far off, the higher ring tones are lost first: dB per octave and per doubling of distance
DISC_DULLING_DB = 1.2


def wheel_discs():
    """Rolling keeps the discs ringing in uneven bursts; pitches shift as the contact point wanders."""
    pitch_factor, ringing = curves(PASSING_PITCH)[0], 0
    for hz, width, db in DISC_TONES:
        dull_db = DISC_DULLING_DB * doublings() * np.log2(hz / DISC_TONES[0][0])
        ragged = walk(width) + 1j * walk(width)
        drive = ragged * undb(db - dull_db + 3.0 * walk(35))
        pitch = hz * pitch_factor * (1 + .007 * walk(25))
        ringing = ringing + np.real(drive * np.exp(2j * np.pi * np.cumsum(pitch) / SR))
    disc_db = carried(*DISC_CARRY, STRETCH_SHARE * stretches())
    return ringing * nearness() * undb(disc_db) * pan(sides()[2])


# heavy knocks set the wheels ringing harder for a moment, or it eases off: (t/s, level change/dB)
WHEEL_SURGES = [(7.925, 3), (8.035, 2.5), (8.2, -1.5), (8.34, 1.5), (8.695, 3), (8.75, -1.5)]
WHEEL_SURGE_S = .025


def rolling():
    """Rough steel shakes ground, bogies, rail and wheels together."""
    load = undb(0.75 * walk(40))  # the contact force flutters, and bogies and rail with it
    surges = undb(swells(WHEEL_SURGES, WHEEL_SURGE_S))
    shaken = load * (bogies() + roar() + rail())
    surged = surges * (wheels() + wheel_discs() + rolling_hiss())
    return ground() + shaken + surged


def scene():
    """Mix the faint background, the camera and the passing train."""
    background = air() + distant_hum() + ticks() + rail_song() + rail_hiss()
    train = whine() + drumming() + knocks() + wheel_flat() + rolling()
    return background + shutter() + train


TOP_HZ = 15900


def record(dry):
    """The recorder rounds the very highest peaks and cuts the top."""
    rounded = dry / (1 + (dry / .92) ** 8) ** (1 / 8)
    return signal.sosfilt(signal.ellip(10, .2, 80, TOP_HZ, fs=SR, output="sos"), rounded)


dry = scene()
out = record(dry)
transcribe(out)
```